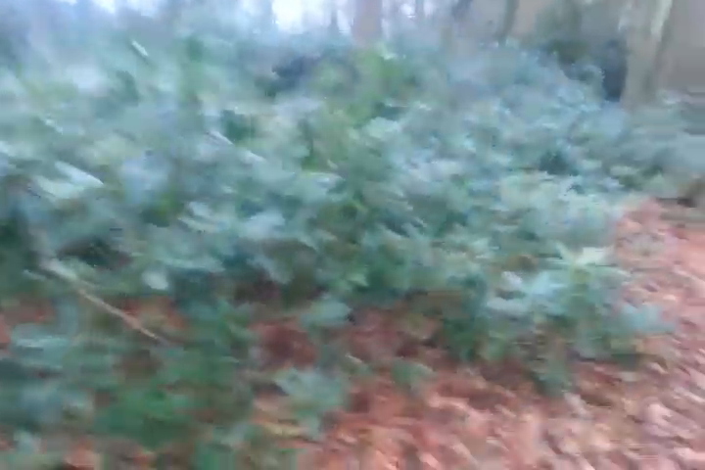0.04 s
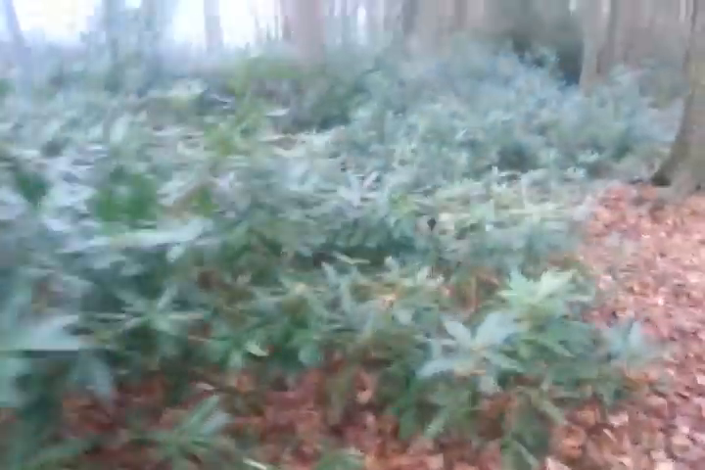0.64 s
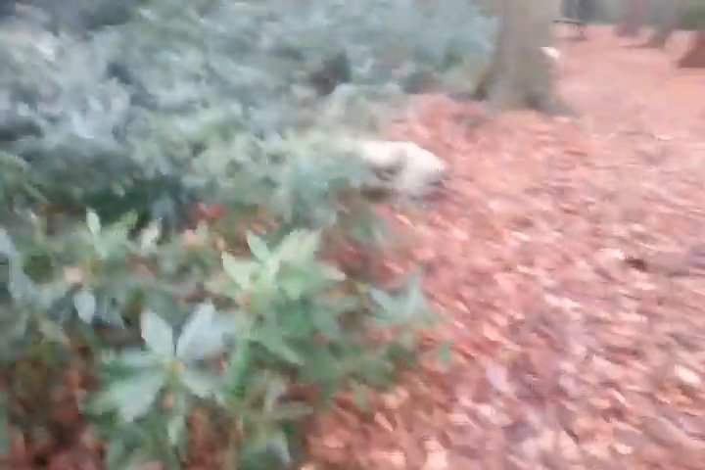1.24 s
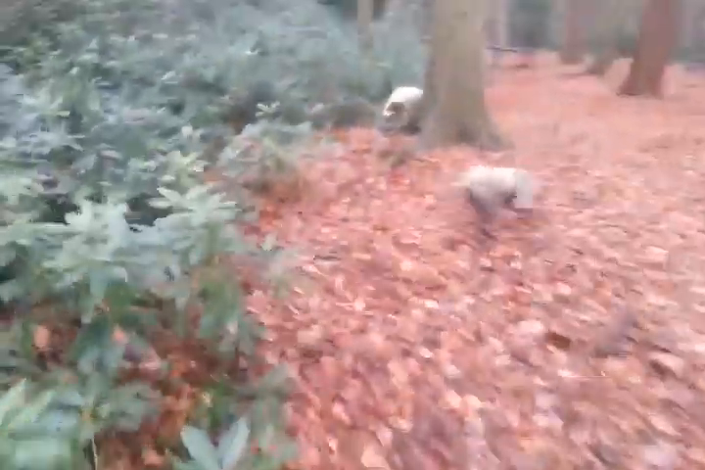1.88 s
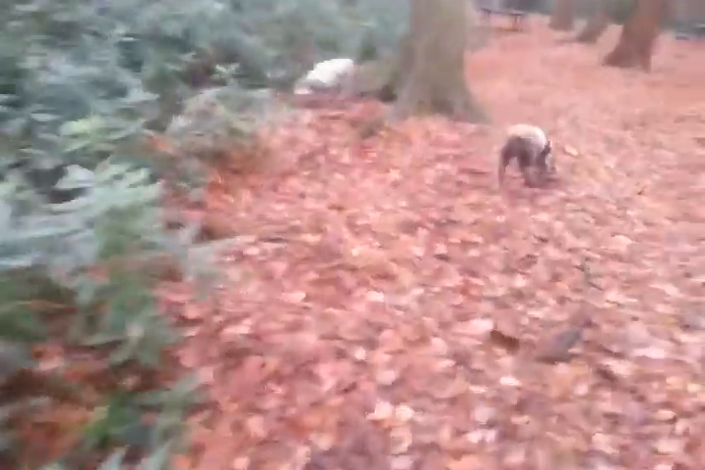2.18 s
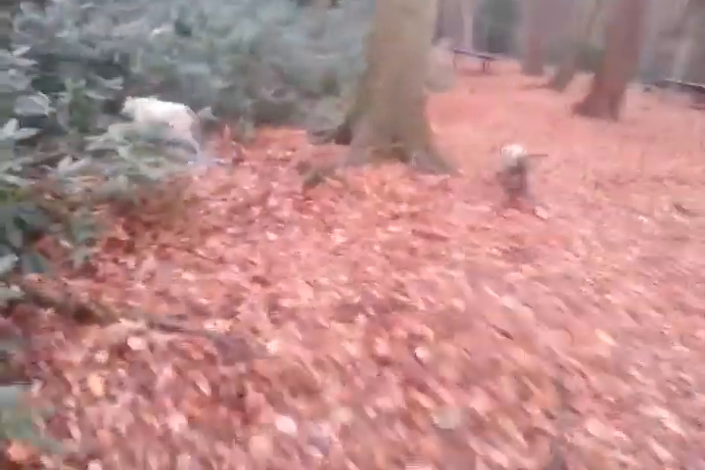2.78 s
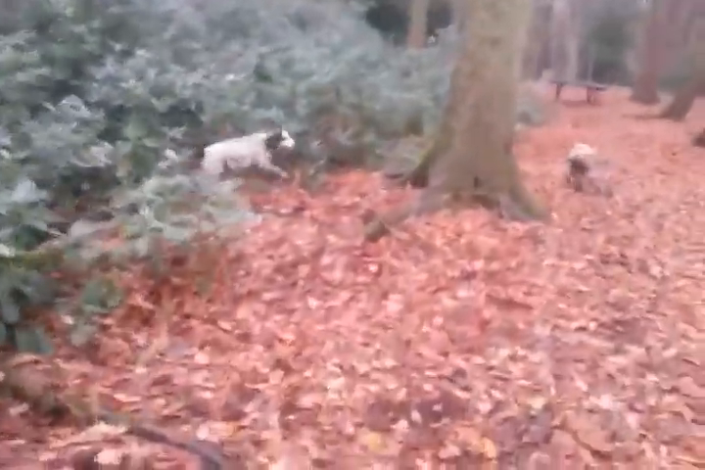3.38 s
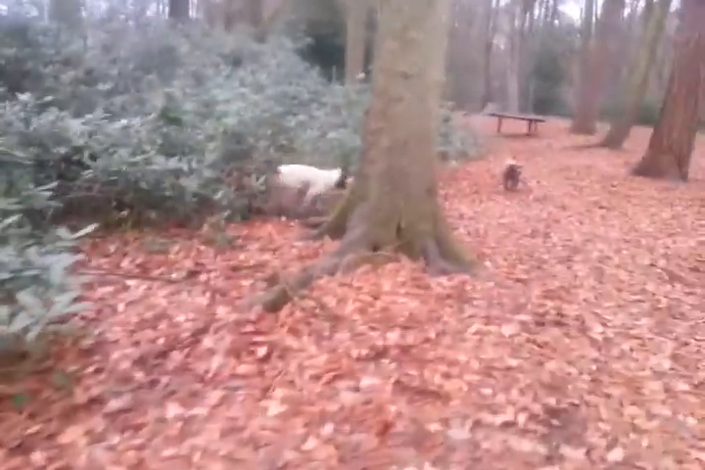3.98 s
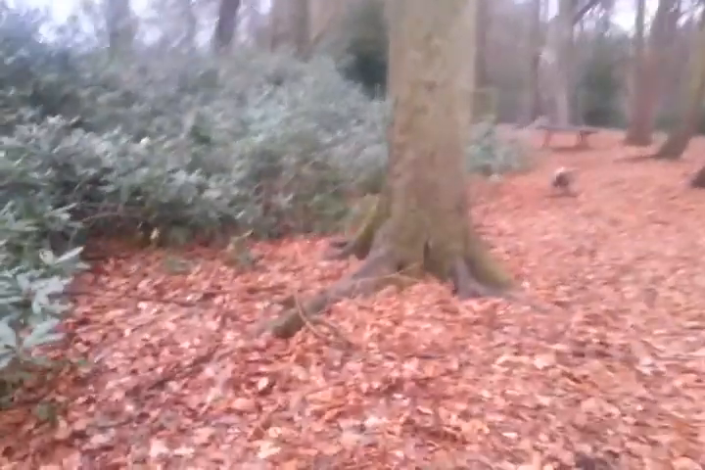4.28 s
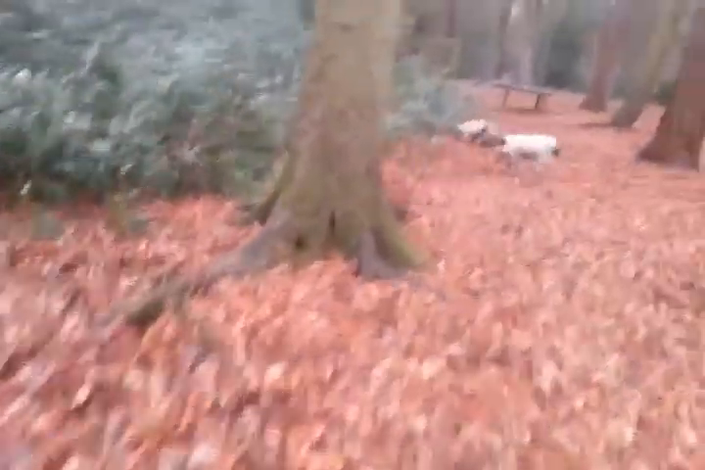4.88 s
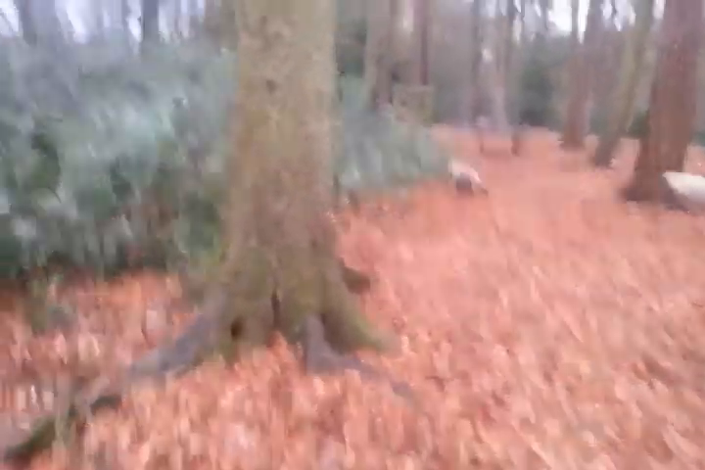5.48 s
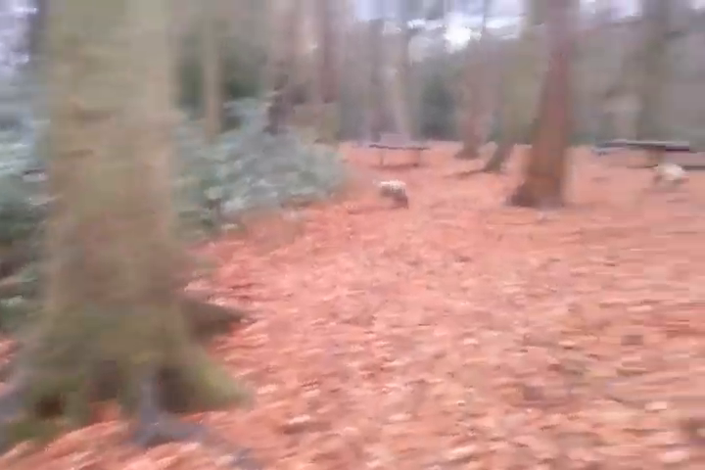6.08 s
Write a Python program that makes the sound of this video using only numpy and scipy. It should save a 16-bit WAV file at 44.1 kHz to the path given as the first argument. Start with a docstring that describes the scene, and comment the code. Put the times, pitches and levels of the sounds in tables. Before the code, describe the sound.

Someone walks through dry fallen leaves in a wood, feet crunching and legs brushing shrubs close to the microphone. Low, thumping wind buffets it from the start, and small twigs snap along the way. A dog yelps once far off, the wind eases, and the dog yelps again before a small dull knock on wood and the last steps. Nearly everything is on the left.

```python
"""A walk through dry fallen leaves in a wood, heard close up, nearly all on the left channel.
From the first moment legs brush shrubs, feet crush the litter and moving air buffets the microphone;
the muffled right side carries only faint wind, fizz and hiss. Twigs start snapping just before 1 s.
At 2 s a dog yelps far off among the trunks. The wind eases after 3 s, the dog yelps again at 4.5 s,
and near 5 s a foot knocks on wood before the last gusts and steps."""
import sys
import numpy as np
from scipy import signal
from scipy.fft import rfft, irfft, next_fast_len
from scipy.io import wavfile
from scipy.ndimage import uniform_filter1d

SR = 44100
rng = np.random.default_rng(int(sys.argv[2]) if len(sys.argv) > 2 else 0)


def digitize_waveform(pressure):
    """Quantize a signal to 16-bit integers and store it at the path in sys.argv[1].

    Rows of a 2-D input are taken as channels; values are limited to [-1, 1].
    """
    field = np.atleast_2d(pressure).T
    bounded = np.clip(field, -1, 1)
    quanta = np.round(bounded * 32767).astype(np.int16)
    wavfile.write(sys.argv[1], SR, quanta)


N = 275184


def amp(db):
    """Decibels to gain."""
    return 10 ** (np.asarray(db) / 20)


def rms_one(x):
    """Scale to rms 1."""
    return x / np.sqrt(np.mean(x ** 2) + 1e-20)


def in_time(curve):
    """A curve of (time, value) points, read at every sample."""
    return np.interp(np.arange(N) / SR, *np.transpose(curve))


def add(track, s, sound):
    """Mix a sound in at s seconds."""
    at = int(np.clip(round(s * SR), 0, N - 1))
    track[at:at + len(sound)] += sound[:N - at]


def drift(hz):
    """Random wander, mostly slower than hz, with rms 1."""
    pole = np.exp(-2 * np.pi * hz / SR)
    return rms_one(signal.lfilter([1], [1, -2 * pole, pole * pole], rng.standard_normal(N + SR))[SR:])


def swell(length, attack_s, release_s):
    """A straight rise, a hold until the length is over, then a dying tail."""
    t = np.arange(SR) / SR
    return np.minimum(t / attack_s, 1) * np.exp(-np.maximum(t - length, 0) / release_s)


def cut(x, hz, kind, order=2):
    """Butterworth low- or high-pass."""
    return signal.sosfilt(signal.butter(order, hz, kind, fs=SR, output="sos"), x)


def resonate(x, hz, width_hz):
    """One resonance with gain 1 at its peak."""
    r = np.exp(-np.pi * width_hz / SR)
    feedback = [1, -2 * r * np.cos(2 * np.pi * hz / SR), r * r]
    return signal.lfilter((1 - r * r) / 2 * np.array([1, 0, -1]), feedback, x + 1e-18)


def colour(x, spectrum):
    """Minimum-phase filter with the given spectrum; white noise keeps its level."""
    size = 2 * next_fast_len(N // 2 + SR // 10)
    hz, db = np.transpose(spectrum)
    bin_hz = np.arange(size // 2 + 1) * SR / size
    gain = amp(np.interp(np.log(bin_hz + 1), np.log(hz), db))
    cepstrum = irfft(np.log(rms_one(gain)))[:size // 2]
    cepstrum[1:] *= 2
    return irfft(rfft(x, size) * np.exp(rfft(cepstrum, size)))[:N]


def crackle(base_per_s, spread_db, clump_db, patchy_db, bands=14):
    """Tiny fractures come in clumps over the hiss of leaf on leaf; each leaf favours its own pitch."""
    clumps = amp(clump_db * drift(32))
    breaks = rng.random(N) < base_per_s * clumps / SR
    strength = amp(spread_db * np.minimum(rng.exponential(1, N), 3.5))
    clicks = rms_one(breaks * strength * rng.choice([-1, 1], N))
    click_band, out = rng.integers(0, bands, N), np.zeros(N)
    for band, hz in enumerate(np.geomspace(500, 14000, bands)):
        sliding = 0.33 * rng.standard_normal(N) * np.sqrt(clumps)
        out += resonate(clicks * (click_band == band) + sliding, hz, hz / 4) * amp(patchy_db * drift(50))
    return rms_one(out)


# Legs brushing the undergrowth, close by: t/s, level/dB
BRUSH_LEVEL = [(0.0, -61.5), (0.75, -53.5), (1.35, -57), (1.52, -62), (1.72, -58.5), (2.24, -58.5),
               (2.76, -55.5), (2.99, -74), (3.14, -55.5), (3.39, -66.5), (3.92, -68.5), (4.15, -65),
               (4.37, -67), (4.92, -56), (5.09, -76.5), (5.64, -58.5), (5.82, -82), (6.24, -60)]
# Feet ploughing the litter below the microphone: t/s, length/s, level/dB, extra body/dB
FOOTSTEPS = [(0.079, 0.1, -60, 9), (0.313, 0.12, -64.5, 11.5), (0.489, 0.25, -52, -0.5),
             (1.104, 0.089, -42.5, -17), (1.59, 0.3, -58, -1), (2.26, 0.23, -55.5, 2.5),
             (2.648, 0.059, -55, -2), (3.471, 0.13, -48.5, -0.5), (3.992, 0.28, -57, 2),
             (4.85, 0.086, -54, -5), (5.504, 0.075, -53.5, 1.5), (5.949, 0.19, -44, -2)]
# Clumps of leaves crushed underfoot: t/s, level/dB, extra body/dB, length/s
LEAF_CRUNCHES = [(0.243, -57.5, 13, 0.034), (0.655, -54.5, 2, 0.072), (0.701, -47.5, 4.5, 0.03),
                 (0.815, -50, 1.5, 0.068), (0.895, -74, 7, 0.072), (1.027, -40, -4, 0.023),
                 (1.1, -48, 7.5, 0.11), (1.282, -50, -2, 0.026), (1.376, -61, -5, 0.03),
                 (1.594, -51, -1.5, 0.051), (1.67, -68, -22, 0.019), (1.72, -42, -5.5, 0.043),
                 (1.841, -47.5, 0, 0.058), (1.957, -52, 2, 0.037), (2.019, -58.5, 5, 0.14),
                 (2.178, -45.5, 3, 0.011), (2.282, -45.5, 0, 0.029), (2.345, -40.5, 2.5, 0.021),
                 (2.863, -53, -0.5, 0.062), (3.06, -47.5, 3.5, 0.033), (3.285, -56.5, 6.5, 0.031),
                 (3.433, -49.5, 11, 0.02), (3.724, -54.5, -10, 0.031), (3.77, -49.5, -1, 0.053),
                 (3.857, -58.5, -1, 0.028), (3.943, -54.5, 3, 0.03), (4.189, -51, 1, 0.084),
                 (4.277, -47, -6, 0.041), (4.476, -59.5, 2, 0.059), (4.575, -55, 5, 0.031),
                 (4.622, -58.5, -5, 0.015), (4.67, -46, -2, 0.016), (4.775, -47, -2, 0.021),
                 (4.861, -52, 9.5, 0.016), (4.918, -41, 0, 0.018), (5.03, -49.5, -1, 0.021),
                 (5.282, -44, -0.5, 0.036), (5.399, -43, -4, 0.03), (5.423, -48.5, 7.5, 0.044),
                 (5.517, -46, -6, 0.019), (5.579, -48, 0, 0.025), (5.71, -58.5, -4, 0.045),
                 (5.88, -61.5, -0.5, 0.15), (6.205, -53, -12, 0.022)]
# Dry leaves at close range, brightest near 5 kHz: f/Hz, relative level/dB
LEAF_SPECTRUM = [(100, -9), (400, -7.5), (900, -8), (1800, -6.5), (2700, -4.5), (4000, 2), (5100, 4.5),
                 (7200, -10), (11000, -16), (14500, -20.5)]

def leaves():
    """Legs brush shrubs, feet set the litter moving until it settles, and clumps give way in bursts."""
    force = amp(in_time(BRUSH_LEVEL) + 1.5 * drift(5.3))
    weight = force * amp(4.5)   # weight on the litter adds a lower body
    t = np.arange(SR // 4) / SR
    crunch_rise = 1 - np.exp(-t / 0.0021)
    pushes = [(s, db, body_db, swell(length, attack_s=0.025, release_s=0.016))
              for s, length, db, body_db in FOOTSTEPS]
    pushes += [(s, db, body_db, crunch_rise * np.exp(-(t / length) ** 2))
               for s, db, body_db, length in LEAF_CRUNCHES]
    for s, db, body_db, shape in pushes:
        add(force, s, amp(db) * shape)
        add(weight, s, amp(db + body_db) * shape)
    grains = colour(crackle(base_per_s=4500, spread_db=4.5, clump_db=3.5, patchy_db=1.5), LEAF_SPECTRUM)
    body, upper = cut(grains, 2560, "low", order=3), cut(grains, 3600, "high", order=3)
    rub, top = cut(upper, 6830, "low", order=3), cut(upper, 6270, "high", order=3)
    # gentle stirring only rubs; more force breaks leaves and opens the top
    crisp = np.clip((force / amp(-55)) ** 0.092, 0.3, 1.4)
    return weight * body + force * (rub + crisp * top)


# Light air always passing the microphone: t/s, level/dB
DRAUGHT_LEVEL = [(0.0, -45), (0.45, -34), (0.85, -43), (1.87, -60.5), (2.1, -35), (2.72, -43), (2.98, -64),
                 (3.2, -62), (3.7, -69), (4.2, -58.5), (4.55, -54.5), (4.75, -69.5), (5.5, -56.5),
                 (5.8, -81), (6.24, -70)]
# Gusts as the microphone swings with the walk: t/s, length/s, level/dB
SWING_GUSTS = [(0.075, 0.11, -28.5), (0.238, 0.15, -29), (0.473, 0.24, -26.5), (0.864, 0.052, -36),
               (0.974, 0.1, -28.5), (1.191, 0.12, -36.5), (1.376, 0.098, -37.5), (1.531, 0.086, -35.5),
               (1.73, 0.087, -43.5), (1.91, 0.078, -41.5), (2.004, 0.11, -27.5), (2.31, 0.027, -43),
               (2.531, 0.14, -35.5), (2.705, 0.11, -33.5), (3.089, 0.1, -41.5), (4.006, 0.074, -41.5),
               (4.141, 0.12, -50), (4.41, 0.094, -44), (5.436, 0.022, -36), (5.558, 0.11, -33)]

def airflow_db():
    """Level of the air moving past the microphone: gusts on top of a light draught."""
    level = amp(in_time(DRAUGHT_LEVEL))
    for s, length, db in SWING_GUSTS:
        add(level, s, amp(db) * swell(length, attack_s=0.012, release_s=0.024))
    return 20 * np.log10(level)


# Wind right on the left microphone port: f/Hz, relative level/dB
WIND_SPECTRUM = [(40, -18.5), (65, 3.5), (120, 4), (200, 0), (330, -10.5), (480, -20.5), (650, -26),
                 (1200, -47.5), (2500, -69.5)]

def wind():
    """Lumpy turbulence at the port; faster air makes smaller eddies and so a higher rumble."""
    level_db = airflow_db()
    flow = colour(rng.standard_normal(N), WIND_SPECTRUM)
    flow /= np.sqrt(uniform_filter1d(flow ** 2, SR // 25) + 1e-9)   # evened out over 40 ms
    speed = amp(np.clip(0.37 * (level_db + 27.5), -12, 3))
    large_eddies, small_eddies = cut(flow, 178, "low", order=3), cut(flow, 153, "high", order=3)
    return amp(level_db + 3.47 * drift(32)) * (large_eddies + speed * small_eddies)


# The quiet of the wood, all around: f/Hz, relative level/dB
AIR_SPECTRUM = [(25, -17), (100, -14.5), (500, -15), (1000, -20.5), (2800, -35.5), (4800, -24), (8000, -33),
                (14000, -37)]

def still_air(level_db=-66.5):
    """The air of the wood lays a faint, steady hush under the walk."""
    return amp(level_db) * colour(rng.standard_normal(N), AIR_SPECTRUM)


# Wind on the muffled right port: f/Hz, relative level/dB
RIGHT_WIND_SPECTRUM = [(30, -9.5), (100, -5), (250, -6), (400, -16.5), (600, -21.5), (2000, -31),
                       (6000, -38.5)]
# The right channel's noise floor, rumble and thin hiss: f/Hz, relative level/dB
RIGHT_FLOOR_SPECTRUM = [(25, 19), (55, 7.5), (110, -18.5), (400, -14), (2000, -48), (14000, -32)]

def right_port(walk):
    """The weak side: its own low wind and a thin fizz that swells with the leaves, over steady noise."""
    breeze = amp(0.57 * airflow_db() - 47) * colour(rng.standard_normal(N), RIGHT_WIND_SPECTRUM)
    walk_db = 10 * np.log10(uniform_filter1d(walk ** 2, SR // 40) + 1e-10)
    fizz = amp(0.4 * walk_db - 49) * rng.standard_normal(N)
    return breeze + fizz + amp(-69.5) * colour(rng.standard_normal(N), RIGHT_FLOOR_SPECTRUM)


# Eddies striking the left port: t/s, level before the bass cut/dB, nominal f/Hz, edge against push/dB
EDDIES = [(0.111, -15.5, 191, -22), (0.129, -20, 159, -32), (0.265, -35, 263, -1), (0.284, -14, 264, -15.5),
          (0.415, -17, 236, -32), (0.499, -11, 120, -50), (0.542, -7.5, 255, -24), (0.548, -14.5, 256, -48),
          (0.674, -17.5, 131, -30), (0.915, -17, 172, -36), (1.012, -20, 194, -30), (1.02, -11, 252, -19.5),
          (2.08, -17, 230, -0.5), (2.086, -11, 149, -31), (2.161, -20.5, 193, -16),
          (2.423, -19.5, 103, -21.5), (2.744, -15, 132, -21), (3.069, -40, 109, -28),
          (3.278, -41, 130, -11), (3.553, -42, 90, -37), (4.048, -26.5, 100, -22), (4.173, -30.5, 101, -22),
          (4.254, -29.5, 92, -24), (4.452, -28, 118, -15), (5.204, -36, 103, -12), (5.373, -37.5, 97, -15),
          (5.564, -26, 81, -45)]

def buffets():
    """Each eddy is one push and pull of pressure, shorter when small; a hard one has a knocking edge."""
    out, t = np.zeros(N), np.arange(SR // 25) / SR - 0.02
    for s, db, hz, edge_db in EDDIES:
        phase = np.pi * hz * 1.15 * t
        push = rng.choice([-1, 1]) * (1 - 2 * phase ** 2) * np.exp(-phase ** 2)
        edge = cut(resonate(rng.standard_normal(len(t)), 450, width_hz=300), 790, "low", order=3)
        edge *= np.exp(-(t / 0.008) ** 2)
        add(out, s + t[0], amp(db) * (push + amp(edge_db) * edge / np.abs(edge).max()))
    return out


# Twigs and stalks snapping close by: t/s, energy/dB, f/Hz, splinter gain/dB
TWIG_SNAPS = [(0.825, -19, 4500, -33), (1.041, -11, 3820, -27), (1.06, -9.5, 5500, -43),
              (1.1055, -29, 4370, -33), (1.2995, -22.5, 4900, -36), (1.6624, -18, 5260, -30),
              (1.6931, -18, 4590, -30), (1.7251, -15, 4340, -35), (2.3012, -10.5, 3420, -35),
              (3.073, -20, 4530, -36), (3.2975, -25.5, 4520, -40), (3.443, -16, 4340, -36),
              (3.487, -27.5, 5680, -33), (3.773, -26.5, 5000, -35), (4.0245, -7.5, 4230, -28),
              (4.075, -18.5, 4170, -27), (4.2058, -13, 3600, -34), (4.6723, -13, 5550, -23),
              (4.973, -24.5, 5500, -35), (5.3028, -16.5, 5850, -24), (5.3499, -20.5, 4640, -36),
              (5.448, -17.5, 3540, -43), (5.882, -26.5, 5100, 9)]

def snaps(width_hz=1300):
    """A twig breaks with one crack, rings for a few cycles and shakes the leaves around it."""
    out, t = np.zeros(N), np.arange(SR // 16) / SR
    for s, db, hz, splinter_db in TWIG_SNAPS:
        crack = rng.standard_normal(len(t)) * (np.exp(-t / 0.0012) + amp(-17) * np.exp(-t / 0.018))
        ring = resonate(crack, hz, width_hz) + 0.5 * resonate(crack, hz * 0.93, width_hz)
        twig = ring + 0.087 * cut(crack, 1500, "high") + amp(splinter_db) * cut(crack, 5300, "high")
        add(out, s, amp(db) * twig / np.linalg.norm(twig))
    return out


# A dog far off in the wood: t/s, length/s, pitch f/Hz, level before scattering/dB, mouth f/Hz
DOG_YELPS = [(1.99, 0.1085, 481, -47, 1220), (4.515, 0.079, 532, -46.5, 736)]

def yelps(harmonics=4, wood_t60_s=0.85):
    """A short, hoarse, arched tone through a dog's open mouth, scattered by many trunks."""
    out = np.zeros(N)
    for s, length, pitch_hz, db, mouth_hz in DOG_YELPS:
        progress = np.linspace(0, 1, int(length * SR))
        hz = pitch_hz * (1 - 0.22 * (progress - 0.35) ** 2 + 0.04 * drift(130)[:len(progress)])
        phase = 2 * np.pi * np.cumsum(hz) / SR
        voice = sum(np.sin(k * phase) / np.hypot(1, (k * pitch_hz - mouth_hz) / 280)
                    for k in range(1, harmonics + 1))
        hoarse = 1 + 0.5 * drift(150)[:len(progress)]
        envelope = np.sqrt(np.abs(np.sin(np.pi * progress)))
        add(out, s, amp(db) * rms_one(voice * hoarse) * envelope)
    t = np.arange(SR) / SR
    trunks = rng.standard_normal(SR) * amp(-60 * t / wood_t60_s)
    return 0.5 * out + signal.fftconvolve(out, trunks / np.linalg.norm(trunks))[:N]


# A foot striking wood below the microphone: t/s, level/dB, f/Hz
FOOT_KNOCK = (4.971, -42, 555)

def knock(decay_s=0.0035):
    """A stick or root under the leaves gives one small, dead note."""
    s, db, hz = FOOT_KNOCK
    out, t = np.zeros(N), np.arange(SR // 20) / SR
    add(out, s, amp(db) * np.sin(2 * np.pi * hz * t) * np.exp(-t / decay_s))
    return out


def scene():
    """Left: the walk close by, wind on the port, the wood and the far dog. Right: the muffled port."""
    walk = leaves() + snaps() + knock()
    left_port = cut(wind() + buffets(), 59, "high")   # the microphone sheds the deepest bass
    return np.array([walk + left_port + still_air() + yelps(), right_port(walk)])


def record(dry):
    """The treble is cut steeply above 14550 Hz."""
    return signal.sosfilt(signal.ellip(10, 0.2, 80, 14550, fs=SR, output="sos"), dry)


dry = scene()
out = record(dry)
digitize_waveform(out)
```